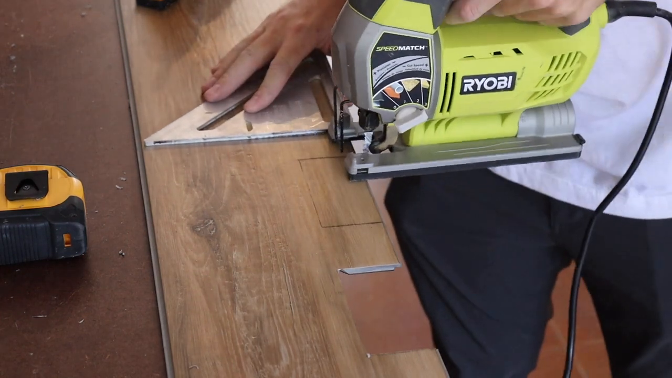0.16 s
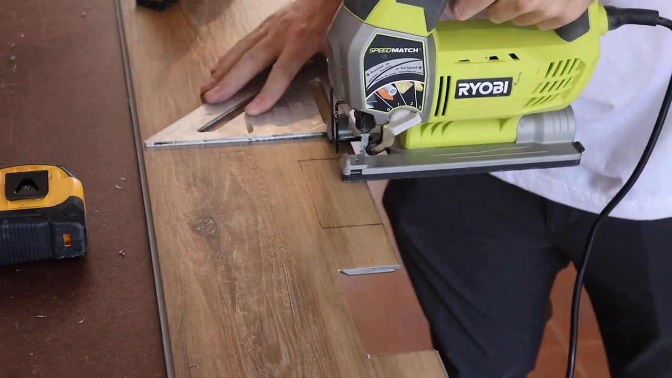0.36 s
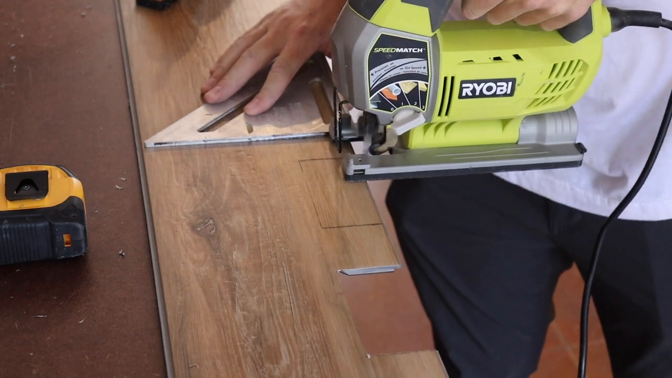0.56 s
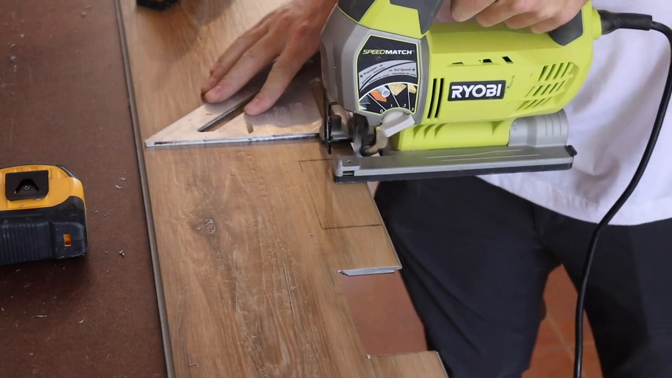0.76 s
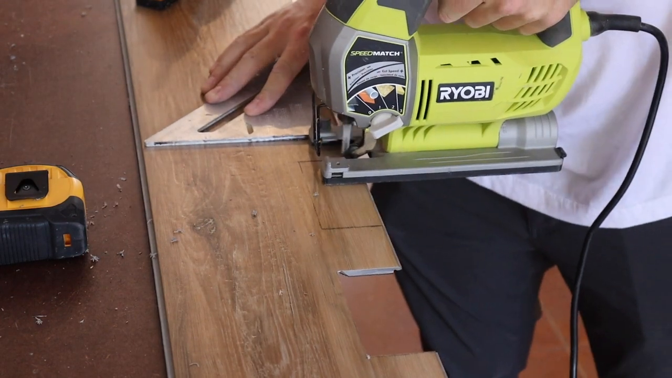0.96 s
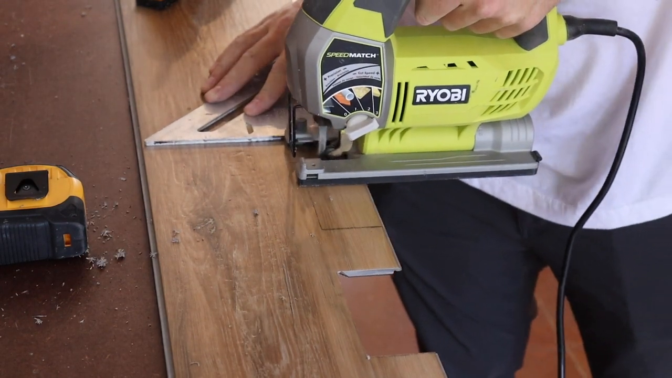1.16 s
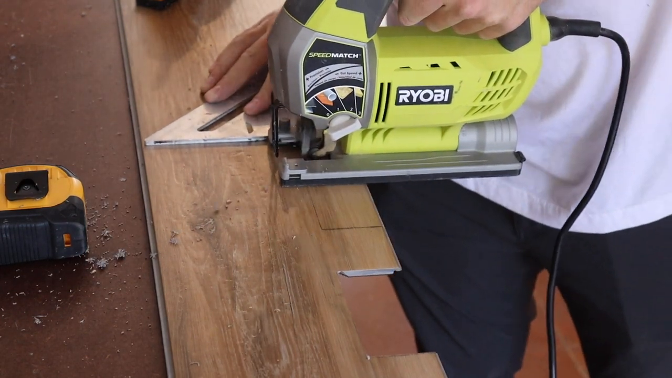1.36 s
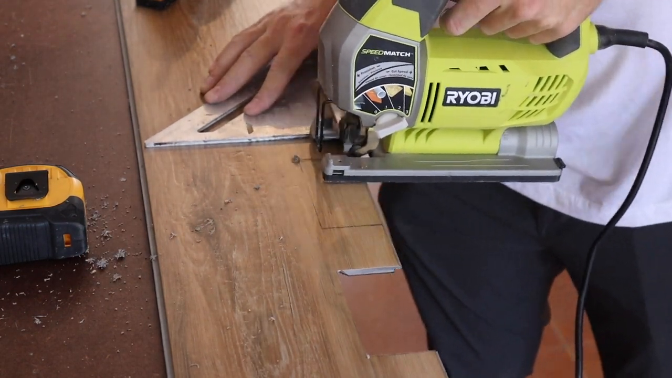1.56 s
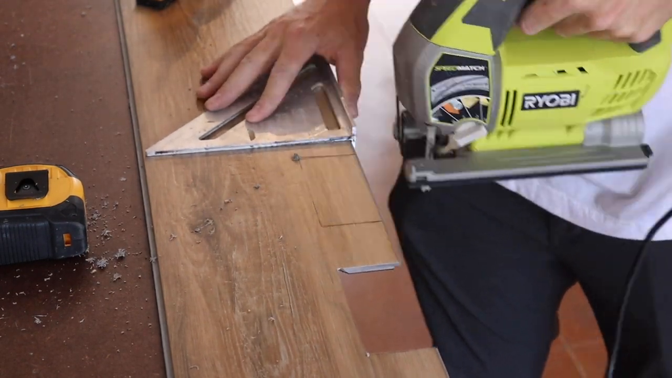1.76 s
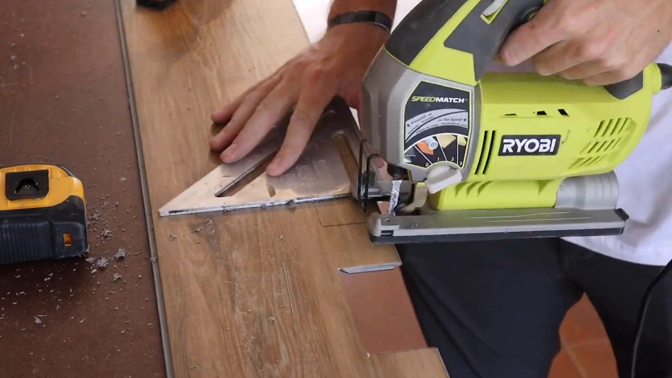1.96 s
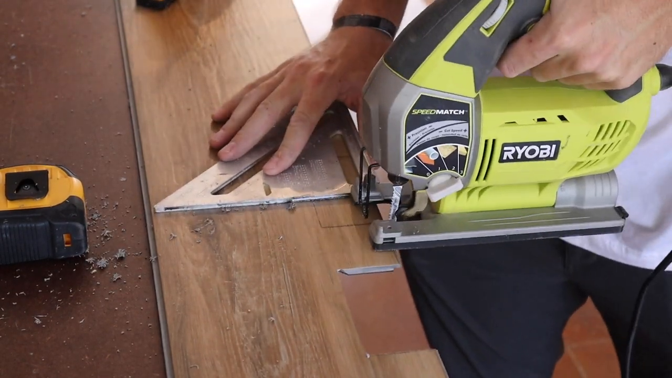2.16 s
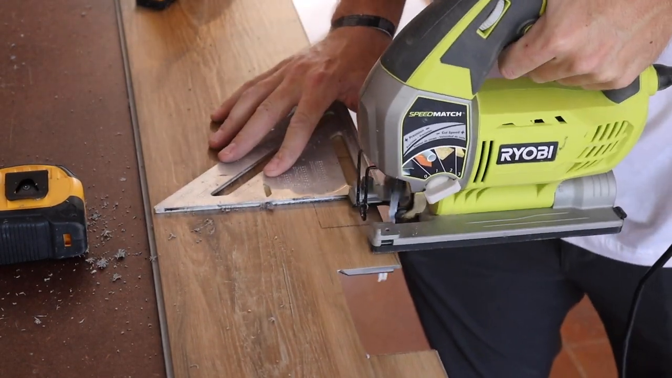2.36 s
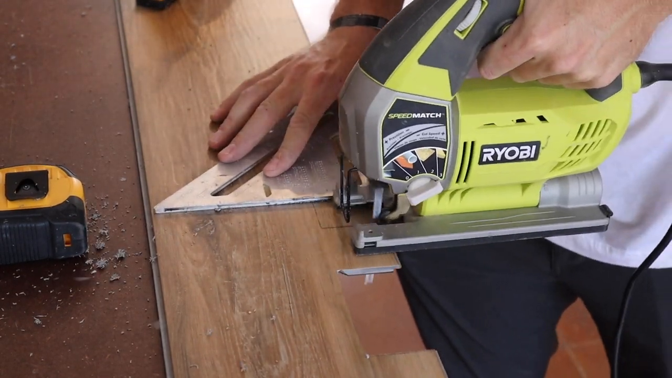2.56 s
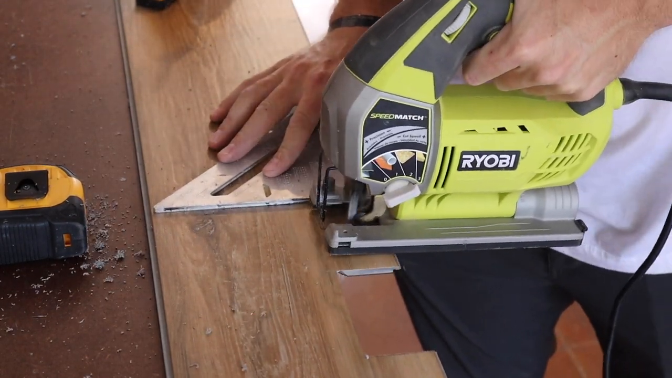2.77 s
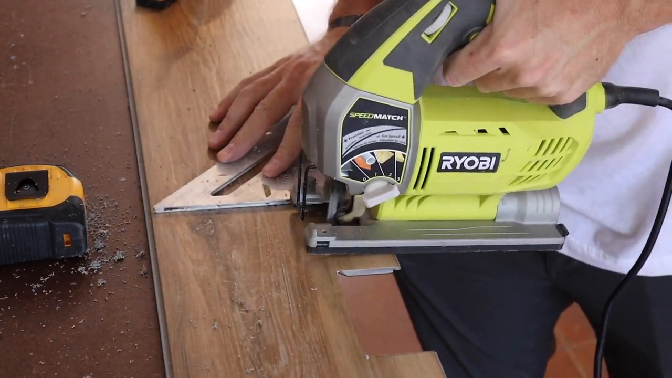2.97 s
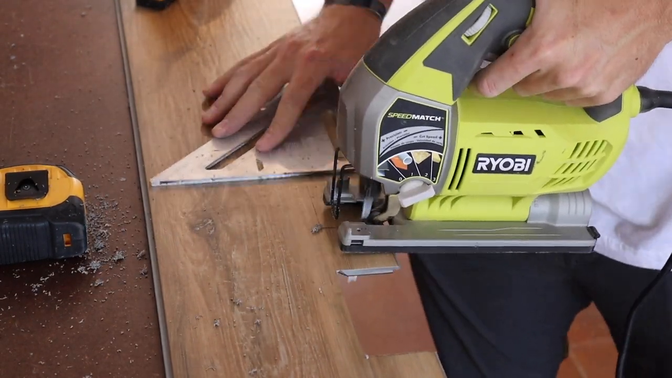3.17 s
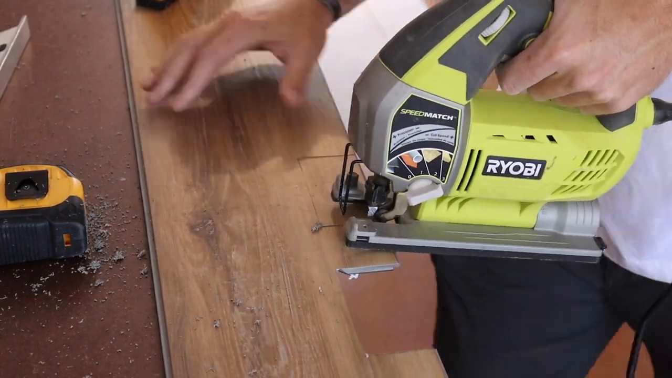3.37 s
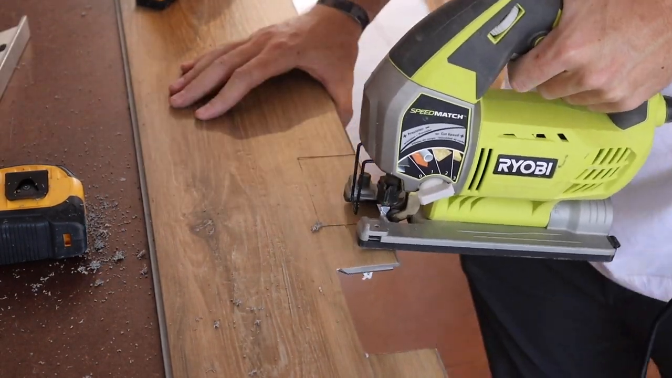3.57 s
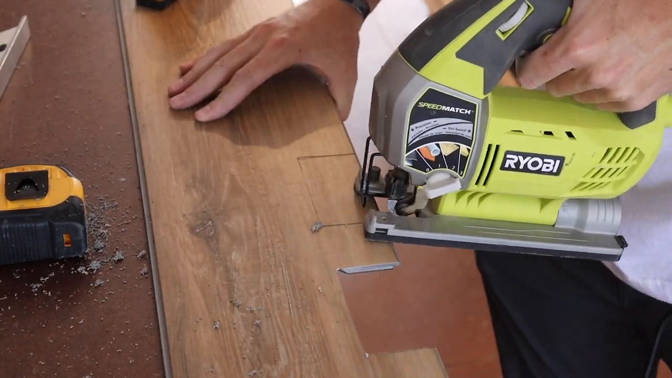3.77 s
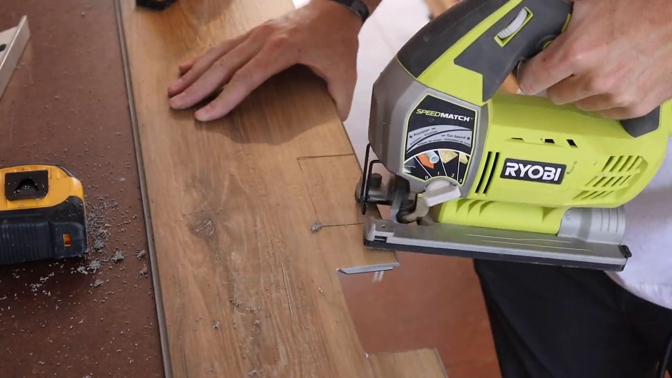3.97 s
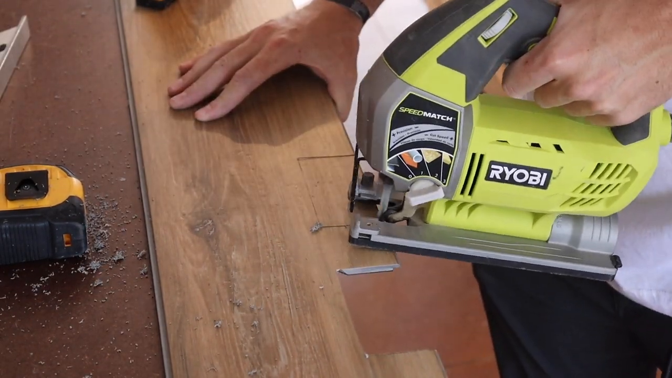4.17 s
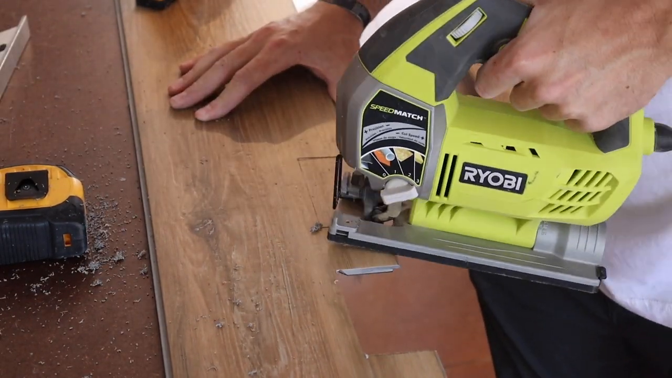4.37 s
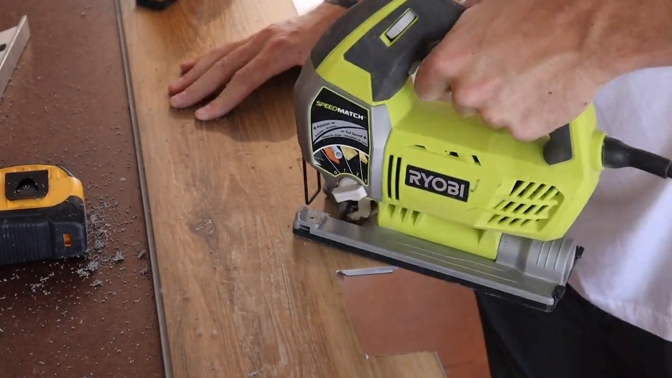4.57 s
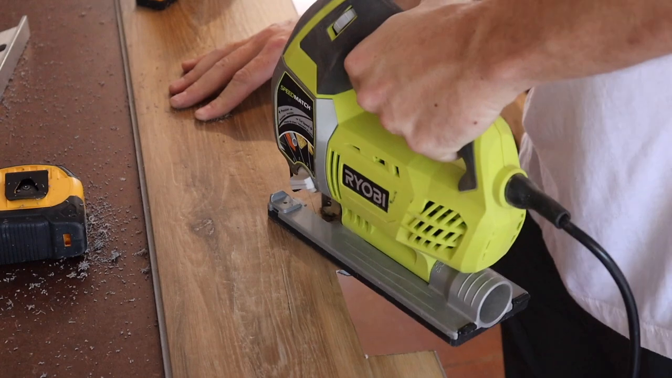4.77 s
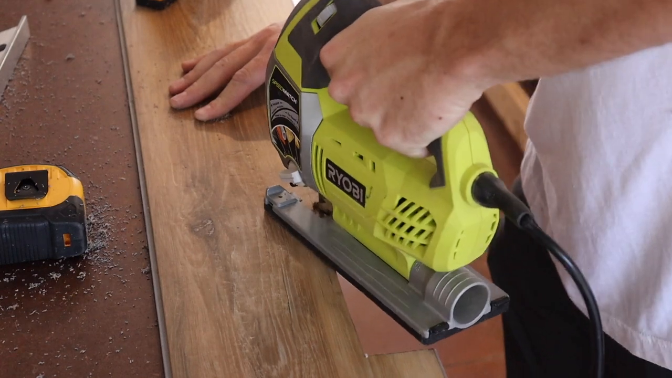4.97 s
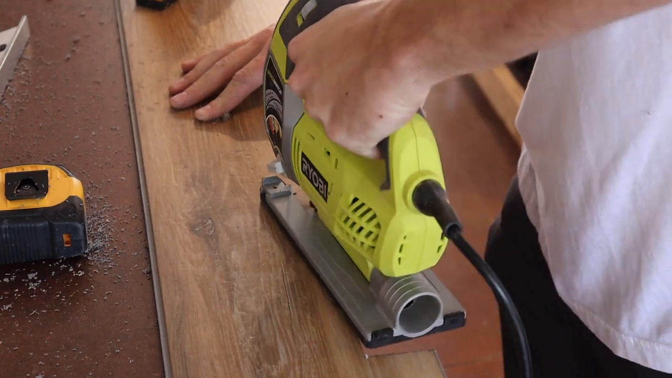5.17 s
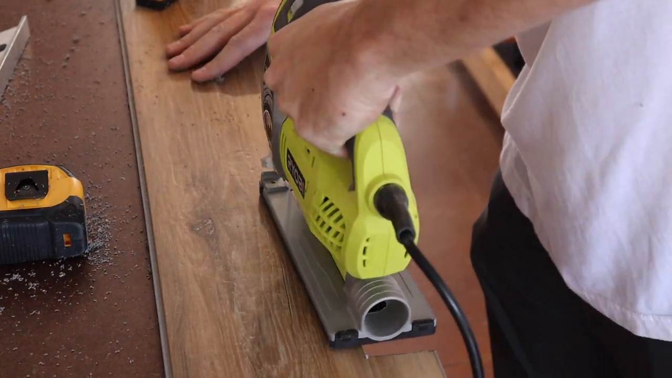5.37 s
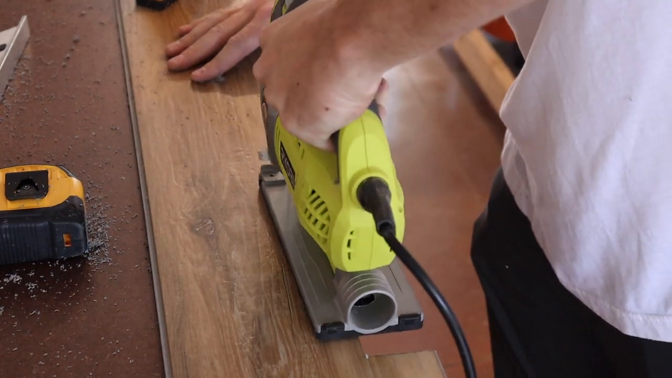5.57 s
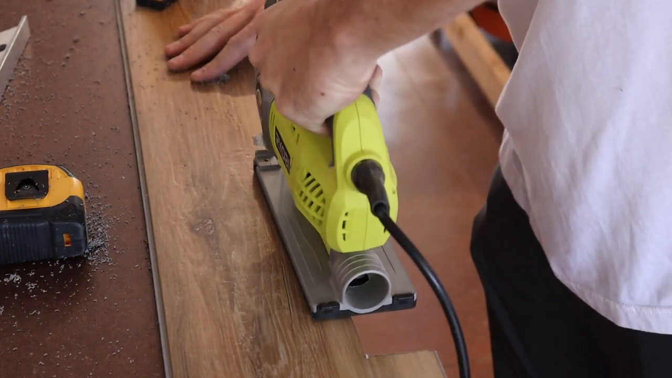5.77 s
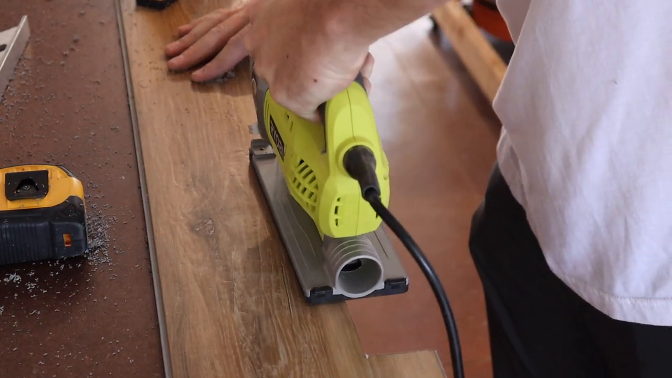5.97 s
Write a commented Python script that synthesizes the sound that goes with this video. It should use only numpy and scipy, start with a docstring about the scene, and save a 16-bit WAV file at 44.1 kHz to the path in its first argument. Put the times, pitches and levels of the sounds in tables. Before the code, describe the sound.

Close up, a jigsaw spins up and saws through a floor plank three times, the last cut longest, with light clicks between.

```python
"""Jigsaw on a workbench

Close to one microphone in a quiet workshop, a corded jigsaw cuts a vinyl plank in three bursts.
The motor spins up, sags under load and coasts down: shaft orders and a bearing whine over the rasp
of fan, brushes and blade. In the last cut the saw turns from side-on to end-on. Around the cuts
it knocks on the plank, its shoe slides, and a metal square is put down."""
import sys
import numpy as np
from scipy import signal
from scipy.fft import rfft, irfft
from scipy.io import wavfile
from scipy.ndimage import uniform_filter1d

SR = 44100
rng = np.random.default_rng(int(sys.argv[2]) if len(sys.argv) > 2 else 0)


def materialize(psi):
    """Save the field psi as 16-bit PCM at rate SR to the path in sys.argv[1].

    A 1-D psi becomes a single channel; in a 2-D psi each row is a channel.
    """
    bounded = np.clip(np.atleast_2d(psi).T, -1, 1)
    quanta = np.round(bounded * 32767).astype(np.int16)
    wavfile.write(sys.argv[1], SR, quanta)


N = 265041
TIME = np.arange(N) / SR
HZ = np.fft.rfftfreq(N, 1 / SR)
WHINE_ORDER = 9.75  # bearing cycles per shaft turn
COAST_S = .3  # from trigger release to standstill
EDGE_HZ = 15900  # top of the microphone's band

# trigger pulls: pulled t/s, released t/s, rasp rise/s, rasp lift/dB, whine lift/dB
BURSTS = [(0.608, 1.47, 0.039, 0.9, 2), (2.355, 3.10, 0.037, 0.47, -1), (3.896, 6.1, 0.045, .5, -2.5)]
# the saw turns its back to the microphone: t/s, share of the turn (0-1)
TURN = [(4.2, 0.01), (4.8, 0.89)]
# spectrum of the saw touching the plank: f/Hz, relative level/dB
CONTACT_SPECTRUM = [(30, -40), (150, -35), (500, -10), (1200, 3.5), (2500, 4.5), (5000, 4.5), (9000, 6.5),
                    (16000, 0.5)]
# spectrum of the quiet workshop: f/Hz, relative level/dB
ROOM_TONE = [(25, -38), (60, -25), (150, -11), (320, -13), (430, -4.5), (500, -12), (870, -8.5),
             (1200, -13.5), (2200, -15), (8700, -21.5), (15800, -20)]


def jigsaw(shudder_db=-58):
    """The saw, close up: one shaft speed drives every layer; at low speed the blade shudders."""
    # fan and brush hiss, and gear rasp: idle level/dB, then five lifts/dB as in level()
    hiss_levels = (-28, -0.5, -3, 6.5, -4.5, 0.55)
    gear_levels = (-37, 0.48, -2.5, 7.5, -1.5, 0.5)
    speed, state, envelope, whine_db = motor()
    turns = np.cumsum(speed) / SR
    coasting = sum((TIME > released) & (TIME < released + COAST_S) for _, released, *_ in BURSTS) > 0
    envelope_db = 20 * np.log10(envelope + 1e-9)
    hiss_db = level(hiss_levels, state) + envelope_db
    gear_db = level(gear_levels, state) + envelope_db
    running = uniform_filter1d(1. * (speed > 0), size=60)
    shudder = amp(shudder_db) * unit(ring(noise())) * np.clip((265 - speed) / 90, .15, 1)
    tones = motor_tones(turns, speed, state, coasting, whine_db)
    tones += amp(hiss_db) * rub_and_alias(turns, speed, coasting)
    return running * (tones + rasp(turns, speed, hiss_db, gear_db) + shudder)


def motor(spin_up_s=.04, surge_s=.11, release_s=.037, rasp_start_db=-17.5, rasp_knee_hz=94):
    """The shaft spins up, sags and coasts: gives speed/Hz, state, noise envelope and whine lift/dB."""
    # whine pitch as the feed loads the motor, a table for each of the first two cuts: t/s, f/Hz
    straight_pitch = [
        [(0.82, 2809), (1.016, 2742), (1.094, 2764), (1.206, 2658), (1.296, 2650), (1.46, 2702)],
        [(2.56, 2736), (2.748, 2663), (2.834, 2660), (2.868, 2681), (3.006, 2668), (3.09, 2683)],
    ]
    # the same for the last cut, where the saw turns: t/s, f/Hz
    turning_pitch = [(4.11, 2785), (4.252, 2771), (4.336, 2683), (4.824, 2503), (4.836, 2466),
                     (4.926, 2453), (5.036, 2644), (5.136, 2667), (5.272, 2587), (5.326, 2623),
                     (5.594, 2659), (5.82, 2562), (6.0, 2595)]
    free_hz = 288  # shaft speed with no load
    full_sag_hz, bind_sag_hz, bind_range_hz = 22.2, 23.63, 9.9  # past full load the blade binds
    burst = np.maximum(np.searchsorted([row[0] for row in BURSTS], TIME) - 1, 0)
    pulled, released, rise_s, rasp_db, whine_db = np.array(BURSTS)[burst].T
    age, coasted = np.maximum(TIME - pulled, 0), np.maximum(TIME - released, 0)
    pitches = [curves(rows)[0] for rows in [*straight_pitch, turning_pitch]]
    cruise = np.choose(burst, pitches) / WHINE_ORDER
    slowing = cruise * (1 - ramp(coasted / COAST_S))
    speed = slowing * (1 - np.exp(-age / spin_up_s))
    sag = free_hz - cruise
    let_go = ramp(coasted / release_s)
    load = ramp(sag / full_sag_hz) * (1 - let_go)
    binding = ramp((sag - bind_sag_hz) / bind_range_hz)
    surge = np.exp(-age / surge_s)
    state = np.array([load, binding, surge, let_go, curves(TURN)[0]])
    attack = (age > 0) * amp(rasp_db + rasp_start_db * (1 - ramp(age / rise_s)))
    fade = np.sqrt(slowing ** 3 / (slowing ** 3 + rasp_knee_hz ** 3))
    return speed, state, attack * fade, whine_db


def level(layer, state):
    """A layer's idle level/dB plus its lifts for load, binding, starting surge, release and turn."""
    idle_db, *lifts_db = layer
    return idle_db + np.array(lifts_db) @ state


def motor_tones(turns, speed, state, coasting, whine_db, jitter=.0021, slack=.125, waver_db=2.12):
    """Tones locked to the shaft: gear buzz, hum, the singing blade and the bearing's whine."""
    # gear buzz: idle lift/dB, then five lifts/dB as in level()
    buzz_lifts = (-9.5, 5.5, 5, -2, -6, -1.5)
    # hum, and the whine's partials from the lowest up: idle level/dB, then the five lifts/dB
    hum_levels = (-64, 14.5, 6.5, -14, -23, -10.5)
    whine_partials = [(-43, -6.5, -10, -3.9, -11, 7.5), (-50, 8.5, -7, 0, -8, 4), (-50.5, 7, 0, 0, -12, 3),
                      (-63, 5, -10, 0, -12, -4)]
    # the blade bites and the plank shakes: start t/s, end t/s, buzz lift/dB, hum lift/dB
    bites = [(1.084, 1.504, 3.5, 2.5), (2.693, 3.138, 1.5, 9), (4.276, 4.788, 5, 9),
             (5.039, 5.197, -3.5, 12), (5.204, 5.449, 4, -1), (5.622, 6.2, 3.5, 8)]
    # the blade sings in its slot: start t/s, end t/s, shaft order, relative peak level/dB
    singing = [(.7, 1.25, 15, -44), (.85, 1.55, 9, -43), (1.1, 1.35, 4, -49), (1.1, 1.5, 19, -45),
               (2.7, 3.15, 9, -51), (3.02, 3.11, 7, -44.5), (4.08, 4.25, 13, -39.5), (4.2, 4.45, 15, -46),
               (4.38, 4.68, 21, -43), (4.42, 4.68, 6, -47.5)]
    loose = ramp((252 - speed) / 15) * coasting  # coasting gears rattle and smear the tones
    turns = turns + (jitter + slack * loose) * wander(150)
    buzz_db, hum_db = sum(np.outer(lifts_db, swell(start, end)) for start, end, *lifts_db in bites)
    out = gear_buzz(turns, level(buzz_lifts, state) + buzz_db)
    out += amp(level(hum_levels, state) + hum_db + waver_db * wander(12)) * np.sin(4 * np.pi * turns)
    for start, end, order, db in singing:
        envelope = swell(start, end) * amp(db + 2 * wander(25))
        out += envelope * np.sin(2 * np.pi * (order * turns + .04 * wander(30)))
    whine_phase = 2 * np.pi * (WHINE_ORDER * turns + .0057 * wander(220))
    for harmonic, partial in enumerate(whine_partials, 1):
        partial_db = level(partial, state) + whine_db + waver_db * wander(22)
        out += amp(partial_db) * np.sin(harmonic * whine_phase)
    up_to_speed = ramp((speed - 185) / 82) ** 2
    return np.sqrt(2) * out * up_to_speed


def gear_buzz(turns, load_db, buzz_db=-45, upper_db=-56.5, lower_db=-68, unsteady_db=2.2):
    """Multiples of the shaft rate, each swelling and fading; faint ones reach far into the treble."""
    # the gears' strong tones: shaft order, relative level/dB
    strong_orders = [(1, -19), (3, -21), (4, -14), (5, -8), (6, -8), (7, -12), (9, -9), (10, -8), (11, -10),
                     (12, -9), (13, -4), (14, -8), (15, -5), (16, -9), (17, -9), (18, -6), (19, -8),
                     (21, -7), (22, -11), (23, -8), (24, -10), (25, -11), (27, -8), (28, -4), (37, -4),
                     (39, -5), (40, -8)]
    strong_db = {order: buzz_db + db for order, db in strong_orders}
    out = np.zeros(N)
    for order in [1, *range(3, 58)]:  # order 2 is the hum
        follow = .8 if order < 9 else .35  # load raises the low orders most
        db = strong_db.get(order, upper_db if order > 9 else lower_db)
        level_db = db + follow * load_db + unsteady_db * wander(7)
        out += amp(level_db) * np.sin(2 * np.pi * (order * turns + rng.random()))
    return out


def rasp(turns, speed, hiss_db, gear_db, throb=.2, grit=.21, grains_per_s=2500, turns_per_stroke=6.2):
    """Air noise and crackling grit, pulsed by each turn and each blade stroke, through the housing."""
    # saw noise with the microphone at its side, and behind it: f/Hz, relative level/dB
    side_on = [(15, -56), (25, -17.5), (486, -17.5), (557, -12), (620, -17.5), (2090, -13), (2660, -8),
               (2890, -10.5), (3580, -5.5), (8490, -2), (10300, 1.5), (15800, -2.5)]
    end_on = [(15, -51), (25, -16.5), (371, -18.5), (527, -14), (620, -17), (1360, -15.5), (2030, -15),
              (2590, -16), (2810, -15), (5230, -4.5), (6140, -10.5), (7630, 2.5), (15800, 4.5)]
    # housing resonances: f/Hz, width/Hz, lift/dB
    housing_peaks = [(3400, 580, 3), (5300, 150, 2.5), (7130, 840, 1.5), (10400, 560, 1.5)]
    grains = rng.uniform(-1, 1, N) * (rng.random(N) < grains_per_s / SR)
    pulse = 1 + throb * (np.cos(2 * np.pi * turns) + np.cos(4 * np.pi * turns)) / 2
    pulse *= 1 + .06 * np.cos(2 * np.pi * turns / turns_per_stroke)
    drive = unit(noise() + grit * unit(grains)) * pulse * amp(.34 * wander(110))
    housing = resonances(housing_peaks)
    high = 1 / (1 + (7000 / (HZ + 1)) ** 6)
    low = 1 / (1 + (HZ / 1800) ** 4)
    turned, = curves(TURN)
    body_db = -38.5 + 1.1 * (gear_db + 34.5)  # the low rumble follows the gear rasp
    out = np.zeros(N)
    for spectrum, share in [(side_on, 1 - turned), (end_on, turned)]:
        radiated = colour(drive, shape(spectrum) * housing)
        hiss, gears, body = (colour(radiated, band) for band in (high, 1 - high - low, low))
        out += share * amp(hiss_db - 2.86) * unit(hiss)
        out += share * (amp(gear_db - 3.5) * gears + amp(body_db) * body) / gears.std()
    return out


def rub_and_alias(turns, speed, coasting, rub_order=66, rub_db=-9.8, alias_db=-14):
    """A high rub falls as the rotor coasts; a thin, high aliasing tone sinks as the shaft speeds up."""
    rubbing = coasting & (rub_order * speed > 3300)
    rub_phase = 2 * np.pi * (rub_order * turns + .11 * wander(700))
    rub = rubbing * np.sin(rub_phase) * (1 + .4 * wander(90))
    alias_hz = 48000 - 117.5 * speed  # mirrored down from above hearing
    alias = np.sin(2 * np.pi * np.cumsum(alias_hz) / SR) * (alias_hz < EDGE_HZ)
    return amp(rub_db) * rub + amp(alias_db) * alias


def knocks(click_t60=.018, tail_t60=.14, tail_db=-13):
    """The saw knocks on the plank: a sharp click, a short rattle and the ring of both."""
    # knocks: t/s, click level/dB, ring level/dB (both relative)
    strikes = [(.046, -41.5, -42), (0.113, -45, -41.5), (0.432, -54.5, -53), (1.754, -34, -39),
               (1.814, -35.5, -55), (1.821, -37.5, -52), (1.954, -48.5, -44.5), (2.040, -46.5, -71),
               (2.052, -44, -38.5), (2.094, -36.5, -56), (2.369, -25, -46), (3.521, -50.5, -61),
               (3.732, -50, -47.5), (4.805, -28, -44), (4.809, -29, -38.5), (4.813, -29, -39),
               (4.817, -34, -41), (4.821, -32, -43.5)]
    blows, power = np.zeros(N), np.zeros(N)
    for s, click_db, ring_db in strikes:
        blows[round(s * SR)] += amp(ring_db)
        power += (amp(click_db) * (dying(s, click_t60) + amp(tail_db) * dying(s, tail_t60))) ** 2
    return ring(blows) + amp(-1) * np.sqrt(power) * shaped_noise(CONTACT_SPECTRUM)


def ring(blows, low_cut_hz=300):
    """Blows ring the modes of saw and plank, which are too small to radiate bass."""
    # modes of saw and plank: f/Hz, relative level/dB, t60/s
    modes = [(434.8, -9.5, 0.42), (441, -8.5, 0.21), (541, -13, 0.075), (575, -11, 0.13), (915, -11, 0.082),
             (1045, -9.5, 0.065), (1510, -16, 0.077), (2200, -33, 0.44), (2520, -15, 0.091),
             (3350, -21.5, .03)]
    t = TIME[:SR // 2]
    response = sum(amp(db - 60 * t / t60) * np.sin(2 * np.pi * hz * t) for hz, db, t60 in modes)
    low_cut = signal.butter(2, low_cut_hz, "high", fs=SR)
    return signal.lfilter(*low_cut, signal.oaconvolve(blows, response)[:N])


def metal_square(hit_t60=.026, tail_t60=.1, tail_db=-11):
    """The square lands on the bench in a quick run of dense metallic hits."""
    # hits: t/s, relative level/dB
    clatter = [(3.392, -22.5), (3.3993, -28), (3.4025, -26), (3.4065, -28), (3.4115, -28), (3.419, -27)]
    # spectrum of a hit: f/Hz, relative level/dB
    hit_spectrum = [(50, -7.5), (250, -15), (420, -6.5), (700, -12), (1100, -5), (2500, -5), (5000, 0),
                    (8000, 1), (16000, -2.5)]
    # resonances of square and bench: f/Hz, width/Hz, lift/dB
    peaks = [(422, 54, 14.5), (564, 60, 12), (1020, 180, 11), (1830, 280, 8), (3320, 130, 8),
             (5150, 140, 9.5), (7100, 220, 7)]
    power = sum((amp(db) * (dying(s, hit_t60) + amp(tail_db) * dying(s, tail_t60))) ** 2
                for s, db in clatter)
    hits = np.sqrt(power) * shaped_noise(hit_spectrum)
    return amp(-2) * colour(hits, resonances(peaks))


def shoe_slide(flutter_db=2):
    """The saw's shoe rubs over the vinyl with a short dry hiss."""
    # course of the slide: t/s, level/dB
    slide = [(1.85, -70), (1.857, -50.5), (1.905, -49.5), (1.93, -57)]
    level_db, = curves(slide)
    moving = (TIME > slide[0][0]) & (TIME < slide[-1][0])
    return moving * amp(level_db + flutter_db * wander(300)) * shaped_noise(CONTACT_SPECTRUM)


def workshop(direct, wet_db=-22, t60=.25):
    """Bench and walls add short reflections, faint at this close distance."""
    t = TIME[:SR // 3]
    tail = rng.standard_normal(len(t)) * amp(-60 * t / t60) * (t > .004)
    return direct + amp(wet_db) * signal.oaconvolve(direct, tail / np.linalg.norm(tail))[:N]


def amp(db):
    """Decibels to gain."""
    return 10 ** (np.asarray(db) / 20)


def unit(x):
    """Scales to rms 1."""
    return x / np.sqrt(np.mean(x ** 2) + 1e-20)


def ramp(x):
    """Holds a share between 0 and 1."""
    return np.clip(x, 0, 1)


def swell(start, end):
    """Half a sine from start to end, else zero."""
    return np.sin(np.pi * ramp((TIME - start) / (end - start)))


def dying(s, t60):
    """An envelope that starts at time s and falls 60 dB in t60 seconds."""
    return (TIME >= s) * amp(-60 * np.maximum(TIME - s, 0) / t60)


def curves(rows):
    """Each column after t/s as a curve over the whole time."""
    s, *columns = np.transpose(rows)
    return [np.interp(TIME, s, column) for column in columns]


def shape(points):
    """A spectrum table as gain at every frequency."""
    hz, db = np.transpose(points)
    return amp(np.interp(np.log(HZ + 1), np.log(hz), db))


def resonances(rows):
    """Resonance peaks as gain at every frequency."""
    return amp(sum(db / (1 + (2 * (HZ - hz) / width) ** 2) for hz, width, db in rows))


def colour(x, gain):
    """Filters by a gain at every frequency."""
    return irfft(rfft(x) * gain, N)


def noise():
    """White noise."""
    return rng.standard_normal(N)


def shaped_noise(spectrum):
    """Noise of rms 1 that follows a spectrum table."""
    return unit(colour(noise(), shape(spectrum)))


def wander(rate_hz):
    """A random drift of rms 1 that changes course rate_hz times a second."""
    knots = rng.standard_normal(4096)
    return unit(np.interp(TIME * rate_hz, np.arange(4096), knots))


def scene(room_db=-63):
    """The work on the bench sits dead centre, over quiet room tone."""
    bench = jigsaw() + knocks() + metal_square() + shoe_slide()
    mid = workshop(bench) + amp(room_db) * shaped_noise(ROOM_TONE)
    return np.array([mid, mid])


def record(dry, self_noise_db=-80):
    """One close microphone feeds both channels, each with its own faint hiss; then the band limit."""
    hiss = amp(self_noise_db) * np.array([shaped_noise(ROOM_TONE) for _ in dry])
    low_pass = signal.firwin(511, EDGE_HZ, window=("kaiser", 9), fs=SR)
    return signal.oaconvolve(dry + hiss, low_pass[None], "same")


dry = scene()
out = record(dry)
materialize(out)
```